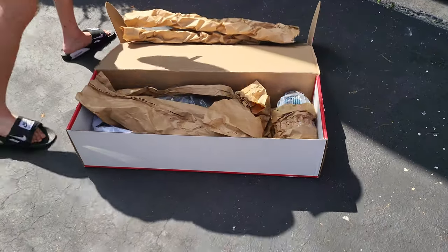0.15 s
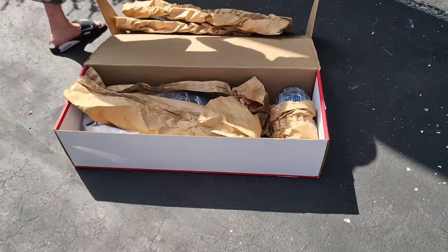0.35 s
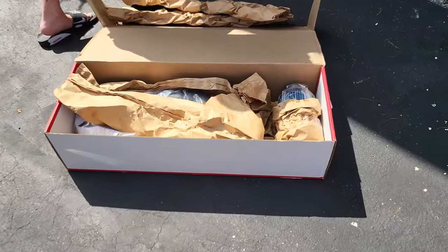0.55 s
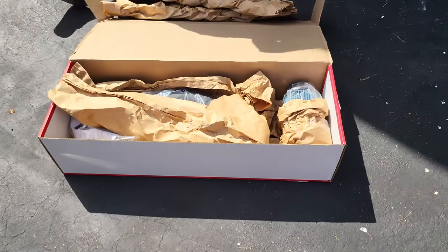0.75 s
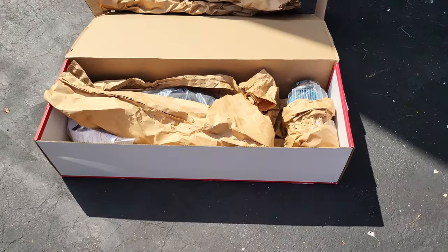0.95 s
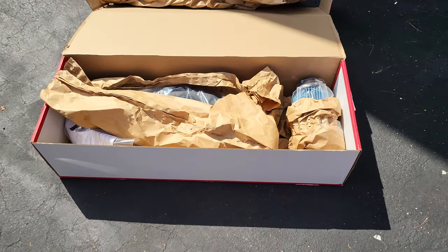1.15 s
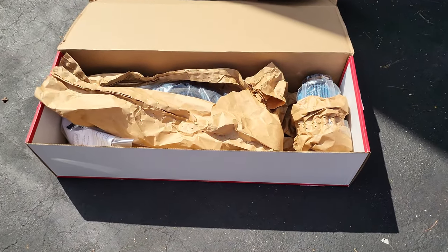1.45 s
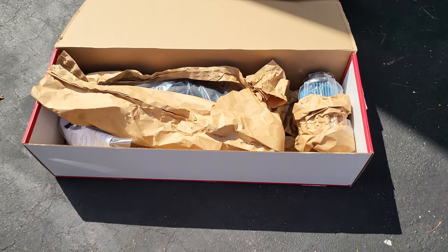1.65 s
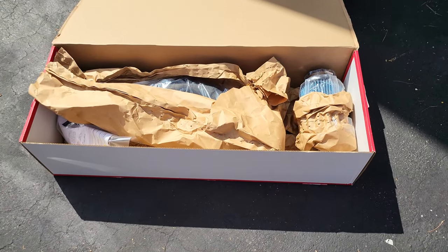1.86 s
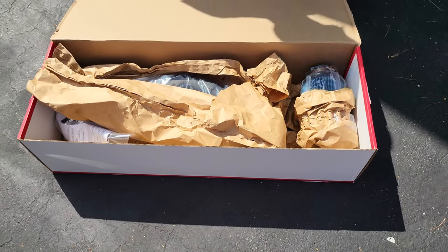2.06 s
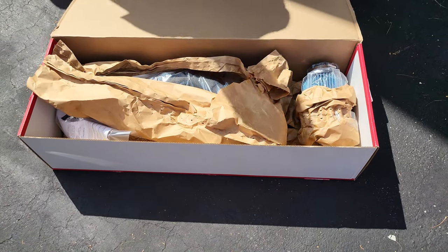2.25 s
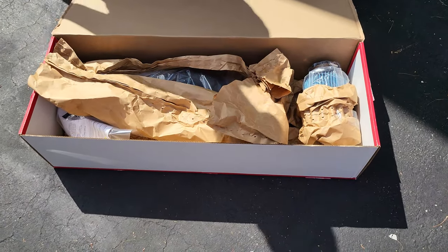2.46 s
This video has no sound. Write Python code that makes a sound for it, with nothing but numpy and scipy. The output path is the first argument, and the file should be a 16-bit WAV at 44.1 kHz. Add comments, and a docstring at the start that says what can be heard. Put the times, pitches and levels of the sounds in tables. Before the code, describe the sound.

Packing paper slides and crinkles in a cardboard box, loudest around 0.4 to 0.5 seconds, with two tiny squeaks and a soft bump. The slide stops at 0.6 seconds; scattered scuffs and snaps continue, with light sandal slaps near 1.0 and 1.4 seconds. A distant bird chirps very faintly at 1.6. Air buffets the microphone around 2.2 to 2.3 seconds, over a constant low outdoor rumble.

```python
"""Over a low outdoor rumble, brown packing paper slides at an open cardboard box in an asphalt yard;
friction rings its hollow body. Dry crinkles, scuffs, two brief squeaks and low bumps of the box join in.
After 0.6 s the slide ends; scuffs and snaps go on, from the paper or from sandals stepping round the box,
and a sole slaps twice. A far bird chirps faintly at 1.6 s. Air buffets the microphone near the end."""
import sys
import numpy as np
from scipy import signal
from scipy.fft import rfft, irfft
from scipy.io import wavfile
from scipy.ndimage import uniform_filter1d

SR = 44100
rng = np.random.default_rng(int(sys.argv[2]) if len(sys.argv) > 2 else 0)


def master(y):
    """Save y as 16-bit WAV."""
    cut = np.clip(np.atleast_2d(y).T, -1, 1)
    pcm = np.round(cut * 32767)  # scale
    wavfile.write(sys.argv[1], SR, pcm.astype(np.int16))


N = 114660
TIME_S, FREQ_HZ = np.arange(N) / SR, np.fft.rfftfreq(N, 1 / SR)


def amp(db):
    """Decibels to gain."""
    return 10 ** (np.asarray(db) / 20)


def unit(x):
    """Scale to rms 1."""
    return x / np.sqrt(np.mean(x ** 2) + 1e-20)


def curve(points, hz=FREQ_HZ):
    """Interpolate a table over log frequency."""
    point_hz, value = np.transpose(points)
    return np.interp(np.log(hz + 1), np.log(point_hz + 1), value)


def pan(db):
    """Stereo gains, left db above right."""
    return amp(np.array([[db], [-db]]) / 2)


def add(mix, start_s, sound):
    """Mix a sound in at start_s."""
    part = mix[:, max(round(start_s * SR), 0):][:, :sound.shape[1]]
    part += sound[:, :part.shape[1]]


def colour(x, gain_db):
    """Minimum-phase filter; gains at evenly spaced frequencies."""
    size = 2 * (len(gain_db) - 1)
    cepstrum = irfft(np.log(amp(np.maximum(gain_db, -100))))
    cepstrum[1:size // 2] *= 2
    cepstrum[size // 2 + 1:] = 0
    return irfft(rfft(x, size) * np.exp(rfft(cepstrum)))


def levelled(db):
    """Shift a spectrum to unit mean power."""
    return db - 10 * np.log10(np.mean(amp(db) ** 2))


def noise(size, shared, envelope=1, max_lag_samples=18):
    """Stereo noise; a shared part reaches the two microphone ports with a random lag."""
    left, right, common = rng.standard_normal((3, size)) * envelope
    lagged = np.roll(common, rng.integers(-max_lag_samples, max_lag_samples))
    return np.sqrt(1 - shared) * np.array([left, right]) + np.sqrt(shared) * np.array([common, lagged])


def background(rumble_db=-41, air_db=-57, flutter_db=2.0, growth_db_per_s=1.17):
    """Unsteady, slowly growing rumble and the even hush of open air."""
    # noise spectra: freq_hz, density_db
    rumble_spectrum = [(18, -38.5), (30, -13), (48, 1), (92, -2), (230, -16), (390, -26), (640, -84)]
    air_spectrum = [(200, -10), (840, -4), (1550, -10.5), (2900, -13.5), (8540, -38), (15500, -44.5)]
    flutter = unit(uniform_filter1d(uniform_filter1d(rng.standard_normal(N), size=2500), size=1500))
    swell = amp(flutter_db * flutter + growth_db_per_s * TIME_S)
    rumble = unit(colour(noise(N, shared=0.089), curve(rumble_spectrum)) * swell)
    air = unit(colour(noise(N, shared=0.053), curve(air_spectrum)))
    return amp(rumble_db) * pan(db=5.5) * rumble + amp(air_db) * pan(db=1.6) * air


def friction(size, slips_per_s=2500, spread_db=2, slip_share=0.48):
    """Tiny slips of uneven size over a fine hiss."""
    slipping = rng.random(size) < slips_per_s / SR
    slips = slipping * amp(spread_db * np.minimum(rng.exponential(1, size), 4))
    return noise(size, shared=0.35, envelope=np.sqrt(1 - slip_share + slip_share * unit(slips) ** 2))


def hollow_db(hz, width_hz=130):
    """Gain of the hollow resonances of paper and box."""
    # resonances: centre_hz, gain_db
    modes = [(1200, 0), (1855, 0.5), (2175, 1)]
    return sum(db / (1 + (2 * (hz - centre_hz) / width_hz) ** 2) for centre_hz, db in modes)


def slide(split_hz=3500, release_db_per_s=200):
    """Paper drags along: friction rings its hollow body and hisses above it."""
    # course of the drag: time_s, body_db, hiss_db
    drag = [(0, -50, -50.5), (.16, -45, -42), (.39, -45, -41.5), (.52, -41.5, -41), (.6, -59, -54)]
    # sliding paper spectrum: freq_hz, density_db
    spectrum = [(240, -53), (400, -23.5), (694, -6), (1020, -16), (1400, 0), (1610, -12.5), (2290, -4.5),
                (3790, -19.5), (4840, -17), (6780, -25.5), (7790, -21), (8530, -37), (9790, -27),
                (15500, -31.5)]
    time_s, body_db, hiss_db = np.transpose(drag)
    release_db = -release_db_per_s * np.maximum(TIME_S - time_s[-1], 0)
    shape_db = levelled(curve(spectrum) + hollow_db(FREQ_HZ))
    crossover = ((FREQ_HZ + 1) / split_hz) ** 6
    out = np.zeros((2, N))
    for level_db, power_loss in (body_db, 1 + crossover), (hiss_db, 1 + 1 / crossover):
        push = amp(np.interp(TIME_S, time_s, level_db) + release_db)
        out += colour(friction(N) * push, shape_db - 10 * np.log10(power_loss))
    return out


def bounce(x, delay_s=0.0021, growth_s_per_s=0.0009, gain=0.48):
    """Add a near reflection; its delay grows as things move, so the colour glides down."""
    delayed_s = TIME_S - delay_s - growth_s_per_s * TIME_S
    return x + gain * np.array([np.interp(delayed_s, TIME_S, channel) for channel in x])


def contact_db(hz, low_db, treble_db, top_db, ring_db=0, ripple_db=2):
    """Spectrum of one snap or scuff; each rings a little differently."""
    # base contact spectrum: freq_hz, density_db
    spectrum = [(180, -19.5), (420, -6.5), (1180, 0.5), (2280, 1), (2610, -5.5), (5950, -11.5), (8420, -23),
                (15500, -21)]
    tilt_db = curve([(810, low_db), (2160, 0), (4470, treble_db), (10800, top_db)], hz)
    ripple = unit(np.interp(hz, np.linspace(0, SR / 2, 160), rng.standard_normal(160)))
    return levelled(curve(spectrum, hz) + hollow_db(hz) + ripple_db * ripple + ring_db) + tilt_db


def snaps(size=8192, attack_s=0.000067, peak_db=7.5, half_width_octaves=0.89, sine_db=-2.5):
    """A crease gives way or a sole taps: a short crack gathered round one ringing note."""
    # crinkles and taps: start_s, level_db, t60_s, ring_hz, treble_db, top_db
    cracks = [(.159, -38.5, 0.11, 1463, -8, 1), (0.4158, -30.5, 0.024, 1704, -17, -8),
              (0.4868, -28, 0.078, 1830, -11, 1), (0.652, -52.5, 0.062, 4140, -11, 12),
              (.797, -46, 0.085, 990, 0, -6), (1.0455, -31.5, 0.037, 558, -7, 1),
              (1.185, -45.5, 0.084, 1380, 1, 8), (1.3735, -35, 0.075, 1330, 1, -14),
              (1.397, -37, 0.012, 5770, 6, 8), (1.7537, -46, 0.062, 2760, -1, -31),
              (1.763, -42, 0.024, 980, 2, -33), (2.001, -41, 0.047, 2110, 6, -8),
              (2.055, -41, 0.055, 820, 0, -9), (2.134, -44.5, 0.021, 4150, -2, -7)]
    out, t, hz = np.zeros((2, N)), np.arange(size) / SR, np.fft.rfftfreq(size, 1 / SR)
    for start_s, level_db, t60_s, ring_hz, treble_db, top_db in cracks:
        fade = np.minimum(t / attack_s, 1) * amp(level_db - 60 * t / t60_s)
        ring_db = peak_db / (1 + (np.log2((hz + 1) / ring_hz) / half_width_octaves) ** 2)
        crack = colour(noise(size, shared=0.41) * fade, contact_db(hz, 0, treble_db, top_db, ring_db))
        note = amp(sine_db) * fade * np.sin(2 * np.pi * ring_hz * t + rng.standard_normal((2, 1)))
        add(out, start_s, crack + note)
    return out


def yard(x):
    """Thin tail from nearby walls, shortest in the top treble."""
    # wall decay: freq_hz, t60_s
    decay = [(1000, 0.19), (6000, 0.37), (15000, 0.076)]
    hz, t, bins = signal.stft(rng.standard_normal((2, SR // 2)), SR, nperseg=256)
    tail = signal.istft(bins * amp(-60 * t / curve(decay, hz)[:, None]), SR, nperseg=256)[1]
    return signal.fftconvolve(x, tail / np.linalg.norm(tail[0]), axes=1)[:, :N]


def scuffs(size=32768):
    """Paper or a sandal rubs briefly: friction swells and dies away."""
    # rubs: start_s, rise_s, t60_s, level_db, low_db, treble_db, top_db
    rubs = [(.195, 0.021, 0.15, -40.5, 2, 3.5, 9.5), (.396, 0.023, 0.16, -34, -2, -4.5, 3.5),
            (.42, 0.014, 0.15, -36.5, 0, 0, 4), (.465, 0.032, 0.22, -35, -4, -0.5, 4),
            (.54, 0.018, 0.13, -42.5, 3, -0.5, -21), (.697, 0.006, 0.69, -48.5, 2, 3, 1),
            (1.046, 0.0024, 0.3, -45, 3.5, 0.5, 10.5), (1.066, 0.019, 0.1, -37.5, -11, -2.5, 2),
            (1.186, 0.037, 0.35, -38, -11.5, -3.5, -6), (1.3325, 0.0025, 0.13, -48, 1, -8, -6),
            (1.366, 0.0055, 0.34, -37, 4.5, -8, -8.5), (1.392, 0.024, 0.42, -45.5, 10, -1.5, -6.5),
            (1.508, 0.012, 0.22, -46.5, 1.5, 2, -2), (1.955, 0.015, 0.043, -49, -2, 6.5, -8),
            (1.98, 0.021, 0.15, -45, -18, 3, -7.5), (2.134, 0.017, 0.12, -53, -5, 1, 3.5)]
    out, t, hz = np.zeros((2, N)), np.arange(size) / SR, np.fft.rfftfreq(size, 1 / SR)
    for start_s, rise_s, t60_s, level_db, *tilt_db in rubs:
        push = np.minimum(t / rise_s, 1) * amp(level_db - 60 * np.maximum(t - rise_s, 0) / t60_s)
        add(out, start_s, colour(friction(size) * push, contact_db(hz, *tilt_db)))
    return out


def whistles(notes, length_s, fall_share=0, waver_share=0.023):
    """Short wavering tones that swell and fade."""
    out, progress = np.zeros((2, N)), np.arange(0, 1, 1 / (length_s * SR))
    for start_s, pitch_hz, level_db in notes:
        waver = unit(uniform_filter1d(rng.standard_normal((2, len(progress))), size=60))
        hz = pitch_hz * (1 - fall_share * progress) * (1 + waver_share * waver)
        swell = amp(level_db) * np.sin(np.pi * progress)
        add(out, start_s, swell * np.sin(2 * np.pi * np.cumsum(hz, axis=1) / SR))
    return out


def squeaks():
    """Brief high squeaks within the scuffs."""
    # squeaks: start_s, pitch_hz, level_db
    notes = [(.396, 7520, -44.5), (.427, 5480, -41)]
    return whistles(notes, length_s=0.018)


def bumps_and_buffets(lag_cycles=0.2):
    """Low pressure swings that reach the two microphone ports slightly apart."""
    # box bumps and air buffets: centre_s, half_length_s, pitch_hz, level_db, left_over_right_db
    swings = [(0.421, 0.0064, 234, -35.5, 1), (.57, 0.045, 217.5, -46, -5), (1.392, 0.024, 50.7, -37.5, 17),
              (2.213, 0.0063, 63.6, -25.5, -8), (2.241, 0.012, 76, -32.5, -21),
              (2.329, 0.0035, 97, -16.5, -7.5)]
    out = np.zeros((2, N))
    for centre_s, half_length_s, pitch_hz, level_db, side_db in swings:
        t = TIME_S - centre_s - np.array([[lag_cycles / pitch_hz], [0]])
        swell = amp(level_db) * np.exp(-(t / half_length_s) ** 2)
        out += pan(side_db) * swell * np.sin(2 * np.pi * pitch_hz * t)
    return out


def slaps(t60_cycles=120):
    """A sandal lands flat; each mode of its sole dies in the same number of cycles."""
    # sole modes: pitch_hz, level_db
    modes = [(1790, -4), (2100, 2), (5700, -13), (7200, -6)]
    # landings: start_s, level_db
    landings = [(1.0453, -38), (1.3693, -49)]
    out, ring = np.zeros((2, 2, N))
    for pitch_hz, level_db in modes:
        cycles = pitch_hz * TIME_S
        fade = amp(level_db - 60 * cycles / t60_cycles)
        ring += fade * np.sin(2 * np.pi * cycles + rng.standard_normal((2, 1)))
    for start_s, level_db in landings:
        add(out, start_s, amp(level_db) * ring)
    return out


def bird():
    """One faint falling chirp, far off."""
    # chirp: start_s, start_pitch_hz, level_db
    notes = [(1.646, 4480, -61.5)]
    return whistles(notes, length_s=0.029, fall_share=0.15)


def scene(tail_db=-10):
    """All sources; only the short contacts feed the yard's tail."""
    contacts = scuffs() + squeaks() + snaps() + slaps()
    tail = amp(tail_db) * yard(contacts)
    return bounce(slide()) + contacts + tail + background() + bumps_and_buffets() + bird()


def record(dry, cutoff_hz=15750):
    """The recorder's band limit."""
    lowpass = signal.firwin(801, cutoff_hz, window=("kaiser", 9), fs=SR)
    return signal.oaconvolve(dry, lowpass[None], "same")


dry = scene()
out = record(dry)
master(out)
```